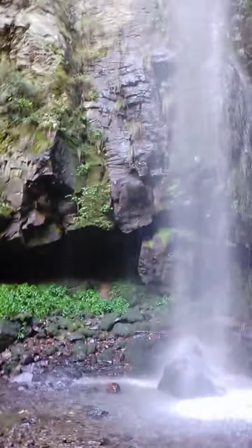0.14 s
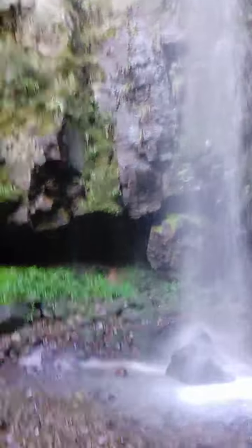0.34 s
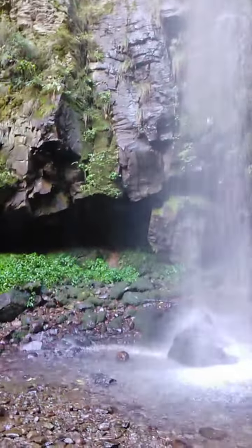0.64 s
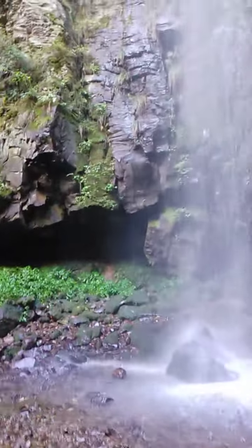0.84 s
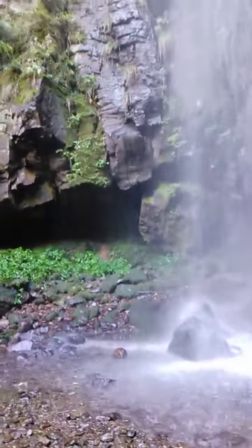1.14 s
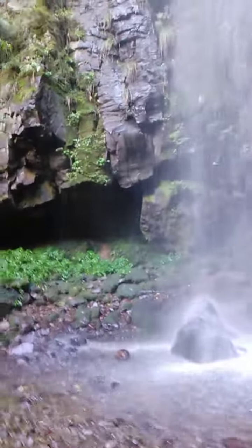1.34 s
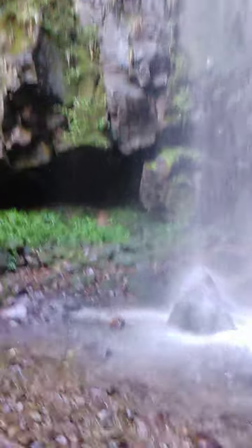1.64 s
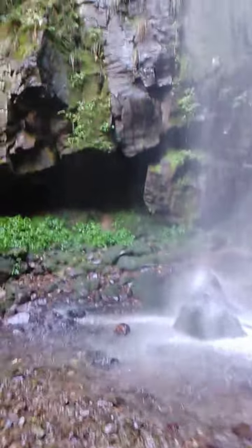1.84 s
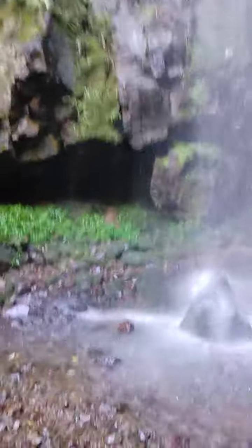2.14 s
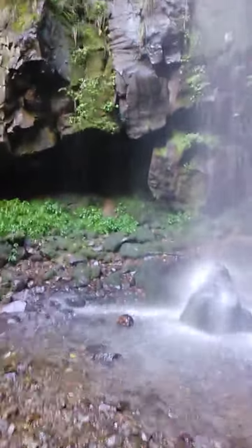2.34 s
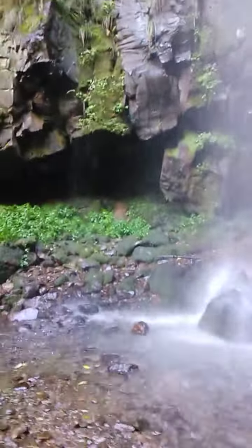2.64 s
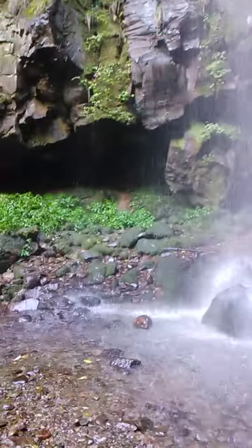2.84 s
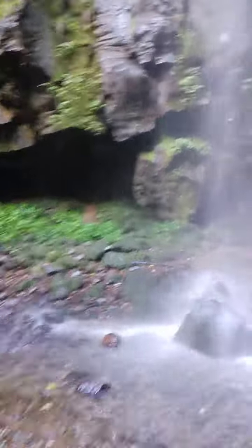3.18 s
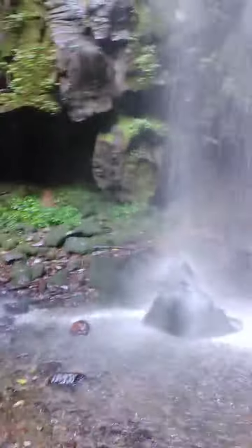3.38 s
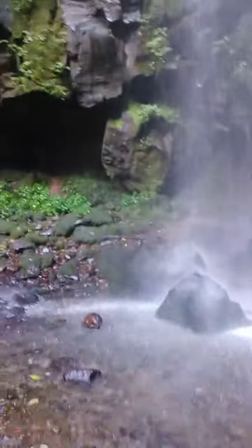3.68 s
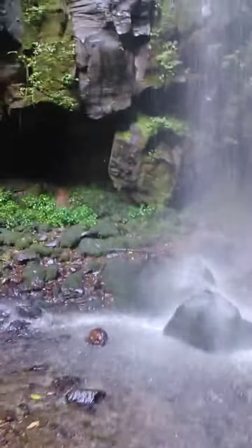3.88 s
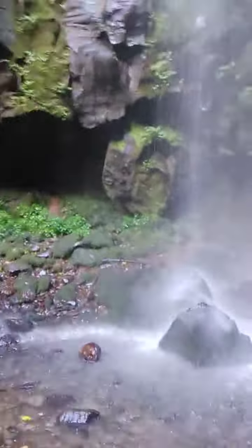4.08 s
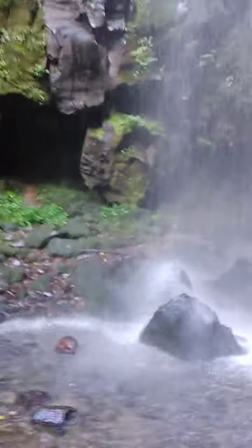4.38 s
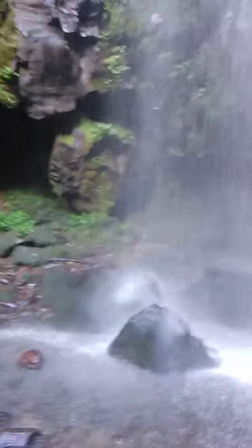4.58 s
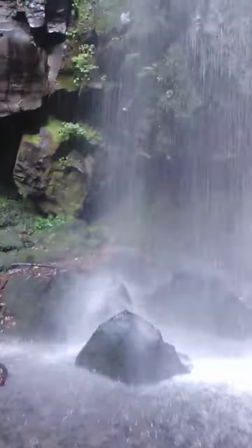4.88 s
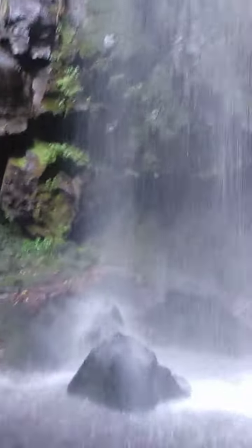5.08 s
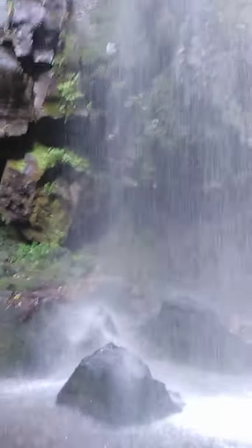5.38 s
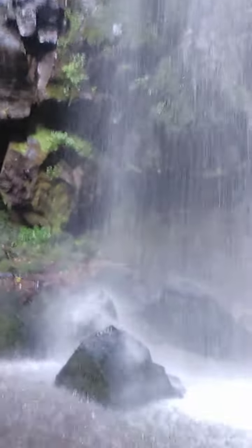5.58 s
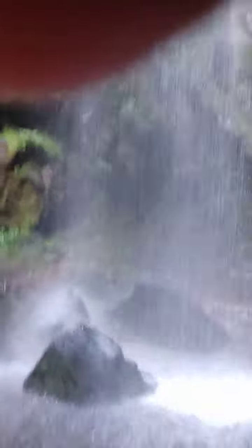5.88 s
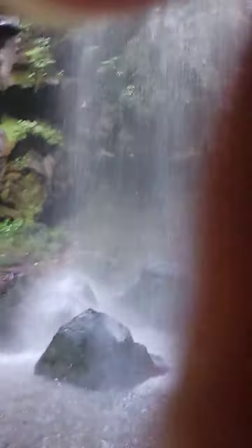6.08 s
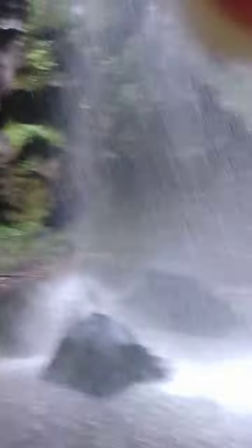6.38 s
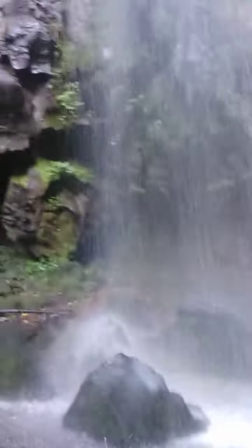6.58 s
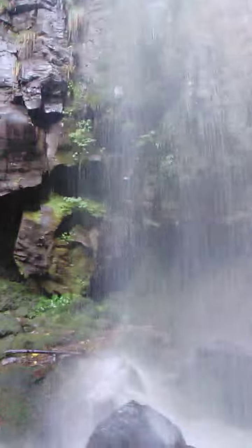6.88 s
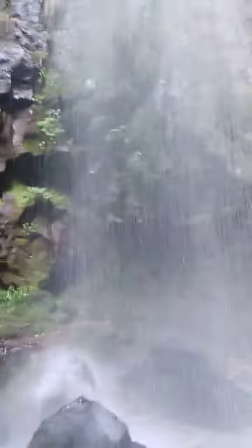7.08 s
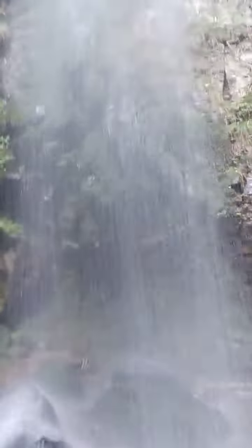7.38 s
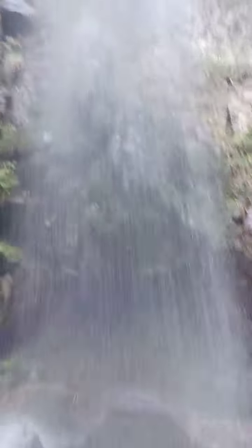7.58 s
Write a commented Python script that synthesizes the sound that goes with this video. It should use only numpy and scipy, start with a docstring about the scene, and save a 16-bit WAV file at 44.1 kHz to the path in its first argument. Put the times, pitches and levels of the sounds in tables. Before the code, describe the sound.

A tall waterfall pours steadily onto a boulder in a rock pool, a bright hissing rush with patter, faint low thumps and a brief hollow colouring.

```python
"""In a rock pool, a tall waterfall pours onto a boulder while a hand-held camera ends up closer to it.
Big air pockets rumble and churn, smaller ones roar: each is noise shaped to its own range of pitches.
Drops patter on stone, splash and hiss as spray: noise mixed with random clicks. The pool mirrors the sound.
Now and then a soft low thump comes through, made of a few ragged cycles.
Late on, fingers cup the microphone for a moment and colour the water with their resonances."""
import sys
import numpy as np
from scipy import signal
from scipy.fft import rfft, irfft, next_fast_len
from scipy.io import wavfile
from scipy.ndimage import uniform_filter1d, map_coordinates

SR = 44100
rng = np.random.default_rng(int(sys.argv[2]) if len(sys.argv) > 2 else 0)


def log_audio(samples):
    """Write samples as a 16-bit WAV file to the path given in sys.argv[1]."""
    # one column per channel
    frames = np.atleast_2d(samples).T
    # limit to full scale, then quantise
    limited = np.clip(frames, -1, 1)
    pcm = np.round(limited * 32767).astype(np.int16)
    wavfile.write(sys.argv[1], SR, pcm)


N = 340452
T = np.arange(N) / SR  # time of each sample, s


def amp(db):
    """Turn decibels into a gain."""
    return 10 ** (np.asarray(db) / 20)


def unit(x):
    """Scale x to an rms (average strength) of 1."""
    return x / np.sqrt(np.mean(x ** 2) + 1e-20)


def curves(rows, t=T):
    """Read each column after the time column at the times t, with straight lines between rows."""
    s, *columns = np.transpose(rows)
    return [np.interp(t, s, column) for column in columns]


def wobble(rate):
    """Draw a smooth random curve through `rate` random points a second."""
    points = rng.standard_normal(int(N * rate / SR) + 4)
    return map_coordinates(points, [T * rate])


def filtered(x, response):
    """Multiply the spectrum of x by a gain that depends on frequency."""
    padded_length = next_fast_len(N + 8192)
    hz = np.fft.rfftfreq(padded_length, 1 / SR)
    return irfft(rfft(x, padded_length) * response(hz), padded_length)[..., :N]


def coloured(x, spectrum):
    """Shape x with a (pitch_hz, relative_db) table, then bring it to rms 1."""
    table_hz, table_db = np.transpose(spectrum)

    def response(hz):
        return amp(np.interp(np.log(hz + 1), np.log(table_hz), table_db))
    return unit(filtered(x, response))


def swept(x, gain, size=1024):
    """Pass x through a gain that changes with both frequency and time."""
    hz, t, frames = signal.stft(x, SR, nperseg=size)
    shaped = frames * gain(hz[:, None], t)
    return signal.istft(shaped, SR, nperseg=size)[1][:N]


def bell(hz, centre_hz, octaves):
    """A smooth resonance hump of height 1."""
    return np.exp(-.5 * (np.log2((hz + 1) / centre_hz) / octaves) ** 2)


def rush(spectrum, patchy_db):
    """Countless bubbles merge into noise; each clump of water has its own colour."""
    def patches(hz, t):
        field = rng.standard_normal((len(hz), len(t)))
        field = uniform_filter1d(field, 12, axis=0)  # blend neighbouring pitches
        field = uniform_filter1d(field, 9, axis=1)   # blend neighbouring moments
        return amp(patchy_db * unit(field))
    return coloured(swept(rng.standard_normal(N), patches), spectrum)


def drops(spectrum, rate, spread_db):
    """Nearer drops slap at random moments (`rate` a second, on average) and in random sizes."""
    hits = rng.random(N) < rate / SR
    sizes = amp(spread_db * np.minimum(rng.standard_normal(N), 2))  # limit the biggest drops
    signs = rng.choice([-1, 1], N)
    return coloured(hits * sizes * signs, spectrum)


# How far the camera is from the fall: start_s, distance_m
CAMERA_DISTANCE = [(0, 7), (.8, 7.5), (2.7, 7.7), (3.7, 6.9), (4.6, 6.3), (5.1, 4.97), (6.2, 4.55),
                   (7.72, 3.98)]
REF_M = 7.48  # distance at which the layer levels and the mirror delay hold


def nearness(t):
    """How many times nearer the fall is than REF_M."""
    return REF_M / curves(CAMERA_DISTANCE, t)[0]


# Treble level as the microphone turns to the spray: start_s, level_db
TREBLE_LEVEL = [(0, -21.5), (.8, -21), (1, -19.6), (1.7, -20.2), (1.95, -18), (2.8, -17.5), (3.8, -18),
                (4.9, -16.5), (6.2, -17.5), (6.6, -16.5), (7.35, -18.5), (7.6, -16.5)]
TREBLE_REF_DB = -19.5  # treble level at which the layer levels hold


def level(base_db, per_near_db, per_treble_db):
    """A layer's dB over time: its base plus so many dB per dB of nearness and per dB of treble."""
    near_db = 20 * np.log10(nearness(T))
    treble_db = curves(TREBLE_LEVEL)[0] - TREBLE_REF_DB
    return base_db + per_near_db * near_db + per_treble_db * treble_db


# Balance of the deepest water sound: pitch_hz, relative_db (per Hz)
RUMBLE_SPECTRUM = [(20, -40), (35, -19), (55, -2.5), (80, -0.5), (120, -3), (170, -10.5), (300, -32)]


def rumble():
    """Big air pockets under the plunge make a deep, unsteady noise."""
    level_db = level(-56.5, per_near_db=.1, per_treble_db=1.1) + 1.9 * wobble(8.9)
    return amp(level_db) * coloured(rng.standard_normal(N), RUMBLE_SPECTRUM)


# Balance of the churning water: pitch_hz, relative_db (per Hz)
CHURN_SPECTRUM = [(70, -26), (120, -9.5), (170, -4), (280, 2), (420, -0.5), (600, -3), (1100, -29)]


def churn():
    """Big air pockets turn over in the pool as a patchy low noise."""
    level_db = level(-39.5, per_near_db=-0.19, per_treble_db=0.94) + 0.51 * wobble(7)
    return amp(level_db) * rush(CHURN_SPECTRUM, patchy_db=0.75)


# Balance of the roar: pitch_hz, relative_db (per Hz)
ROAR_SPECTRUM = [(150, -30.5), (300, -13.5), (500, -2), (680, 0), (950, 0.2), (1200, 0.5), (1500, -1.5),
                 (1900, -5.5), (2600, -14.5), (4000, -43)]


def roar():
    """Smaller air pockets sound higher and merge into a steady roar."""
    level_db = level(-28, per_near_db=-0.057, per_treble_db=0.058) + 0.11 * wobble(15)
    return amp(level_db) * rush(ROAR_SPECTRUM, patchy_db=0.75)


# Balance of drops on stone: pitch_hz, relative_db (per Hz)
PATTER_SPECTRUM = [(900, -36), (1400, -5.5), (1750, -0.5), (2100, 0), (2600, -1), (3200, -0.5), (3800, -3),
                   (4500, -6), (6000, -22)]
# Level of the patter on the stones: start_s, level_db
PATTER_LOUDNESS = [(0, -29), (1.5, -28), (3.5, -27.5), (3.8, -26.5), (5, -25.5), (5.75, -27), (6.2, -24),
                   (6.8, -25.3), (7.1, -23), (7.72, -22.5)]


def patter():
    """Drops strike the stones: a patchy noise with single slaps mixed in."""
    slaps = drops(PATTER_SPECTRUM, rate=900, spread_db=7)
    mix = rush(PATTER_SPECTRUM, patchy_db=1.02) + amp(-7) * slaps
    return amp(curves(PATTER_LOUDNESS)[0]) * unit(mix)


# Balance of the splashing: pitch_hz, relative_db (per Hz)
SPLASH_SPECTRUM = [(2600, -37), (3800, -10.5), (4500, -2), (5400, -4), (6300, -1), (7000, 0), (8000, -1.1),
                   (9200, -2.4), (10500, -6.5), (13000, -50)]


def splash():
    """Drops fall into the pool: a brighter noise with slaps of very mixed sizes."""
    slaps = drops(SPLASH_SPECTRUM, rate=1500, spread_db=9.0)
    mix = rush(SPLASH_SPECTRUM, patchy_db=0.97) + amp(-9.5) * slaps
    return amp(level(-23.4, per_near_db=0.06, per_treble_db=.66)) * unit(mix)


# Balance of the hissing spray: pitch_hz, relative_db (per Hz)
SPRAY_SPECTRUM = [(6500, -22), (8800, -11.5), (9900, -2.5), (11200, 2.2), (12150, 4.5), (13200, 0.5),
                  (14200, 2), (15200, 4.5), (16000, -5)]


def spray():
    """Drops break into fine spray: a high hiss with many small ticks."""
    ticks = drops(SPRAY_SPECTRUM, rate=2200, spread_db=5)
    mix = rush(SPRAY_SPECTRUM, patchy_db=1.0) + amp(-9.5) * ticks
    return amp(level(-21.15, per_near_db=.01, per_treble_db=1)) * unit(mix)


def waterfall():
    """Sheets of water land unevenly and shake all the light water together."""
    sheets_db = 0.06 * wobble(14) + 0.44 * wobble(70)
    heavy_water = rumble() + churn() + roar()
    light_water = patter() + splash() + spray()
    return heavy_water + amp(sheets_db) * light_water


def pool_mirror(hz, t, smooth_hz=1300, turn_rad=1.05, steepness=8.2):
    """Direct and mirrored sound strengthen or cancel each other, the echo later as the fall nears."""
    mirror_ms, mirror_share = 1.1, 0.56  # echo delay at REF_M; reflected share, 0 to 1
    # ripples scatter the treble, so little of it is mirrored
    share = mirror_share / (1 + (hz / smooth_hz) ** steepness)
    lag_rad = 2 * np.pi * hz * mirror_ms * nearness(t) / 1000
    # the stony shallows turn the echo's phase
    both = 1 + share * np.exp(1j * (turn_rad - lag_rad))
    return abs(both) / np.sqrt(1 + share ** 2)


def close_hiss(hz, t):
    """Up close the finest hiss comes through: 2 dB at 16 kHz per doubling of nearness."""
    return amp(2 * np.log2(nearness(t)) * bell(hz, 16000, octaves=.12))


# Brief swells of the splashing: crest_s, half_length_s, pitch_hz, boost_db
SPLASH_SWELLS = [(.3, 0.63, 1640, 3.3), (2.72, .16, 11300, 2.5), (3.55, 0.18, 11700, 3),
                 (3.6, 0.27, 2100, 2.5), (7.65, 0.34, 2070, 3.3)]


def swells(hz, t):
    """Now and then one band of the splashing swells and sinks back."""
    boost_db = 0
    for crest_s, half_s, centre_hz, db in SPLASH_SWELLS:
        rise_and_fall = np.exp(-((t - crest_s) / half_s) ** 2)
        boost_db = boost_db + db * rise_and_fall * bell(hz, centre_hz, octaves=0.12)
    return amp(boost_db)


# Balance of the raggedness in a thump: pitch_hz, relative_db (per Hz)
THUD_SPECTRUM = [(22, -30), (40, -6), (60, 0), (100, 11), (140, -12), (250, -37)]
# Soft thumps: crest_s, level_db (peak of the smooth swing), pitch_hz, half_length_s
SOFT_THUMPS = [(1.537, -41, 53, .011), (2.102, -27, 64, .013), (2.255, -38.5, 58, .02),
               (3.108, -33, 70, .014), (4.73, -39, 74, .01), (6.136, -36, 77, 0.008),
               (6.837, -33.5, 95, 0.016), (7.438, -35, 89, 0.015), (7.477, -27, 70, 0.013),
               (7.53, -35, 110, .012), (7.595, -34, 64, .016)]


def thumps(rough):
    """Each thump is a short swell of a few low cycles, made ragged by low noise."""
    out = np.zeros(N)
    shudder = rough * coloured(rng.standard_normal(N), THUD_SPECTRUM)
    for crest_s, db, hz, half_s in SOFT_THUMPS:
        near = abs(T - crest_s) < 6 * half_s
        t = T[near] - crest_s
        swing = np.cos(2 * np.pi * (hz * t + rng.random()))
        envelope = 1 / np.cosh(1.4 * t / half_s)
        out[near] += amp(db) * (swing + shudder[near]) * envelope
    return out


def held(on_s, off_s, settle_s, t):
    """A hold that rises smoothly to 1, stays and lets go."""
    rise = np.tanh(2 * (t - on_s) / settle_s)
    release = np.tanh(2 * (t - off_s) / settle_s)
    return (rise - release) / 2


# Resonance of the gap between the shifting fingers: start_s, pitch_hz
FINGER_GAP = [(5.85, 7200), (6.4, 6200), (6.65, 6800), (6.85, 8060), (7.3, 8100)]
# Humps and dips of the gap: multiple (of its pitch), width_octaves, weight (negative = a dip)
FINGER_GAP_MODES = [(1, 0.25, 0.98), (1.39, 0.065, -0.44), (1.64, .15, .7)]
# Colour of the cupped palm: pitch_hz, width_octaves, boost_db (negative = a cut)
PALM_COLOUR = [(740, .15, 4), (1180, 0.092, 9), (2720, 0.19, -1.2), (4170, 0.16, 3.5), (9060, .1, 6),
               (13600, 0.22, -4.5)]


def cupped_hand(hz, t):
    """The finger gap rings twice with a dip between; the palm adds a hollow note and shades the top."""
    gap_hz, = curves(FINGER_GAP, t)
    gap = sum(weight * bell(hz, multiple * gap_hz, octaves)
              for multiple, octaves, weight in FINGER_GAP_MODES)
    gap = gap - 0.095 * bell(hz, 12500, 0.43)  # slight, broad loss of treble
    palm_db = sum(db * bell(hz, centre_hz, octaves) for centre_hz, octaves, db in PALM_COLOUR)
    grip = held(5.83, 7.29, settle_s=0.029, t=t)
    cover = held(5.93, 6.2, settle_s=0.17, t=t)
    return amp(grip * 4 * gap + cover * palm_db)  # 4 dB per unit of gap weight


def scene():
    """The coloured water and the thumps meet at one microphone, which feeds both channels."""
    def colour(hz, t):
        return pool_mirror(hz, t) * close_hiss(hz, t) * swells(hz, t) * cupped_hand(hz, t)
    water = swept(waterfall(), colour)
    sound = water + thumps(rough=.42)
    return np.array([sound, sound])


def record(dry):
    """The camera keeps nothing from 15820 Hz upwards."""
    return filtered(dry, lambda hz: hz < 15820)


dry = scene()
out = record(dry)
log_audio(out)
```